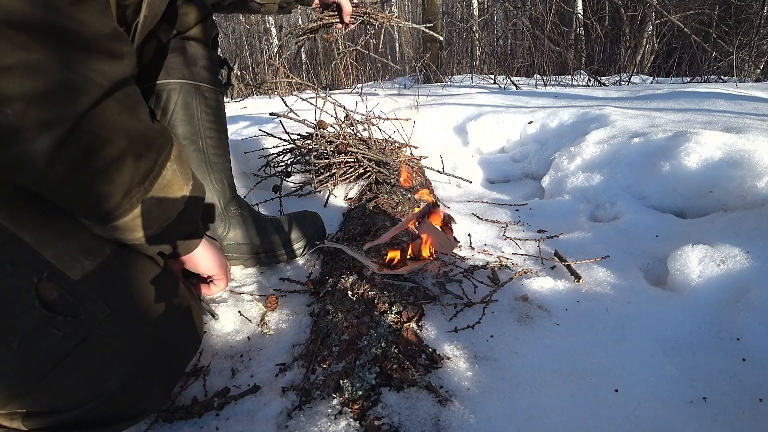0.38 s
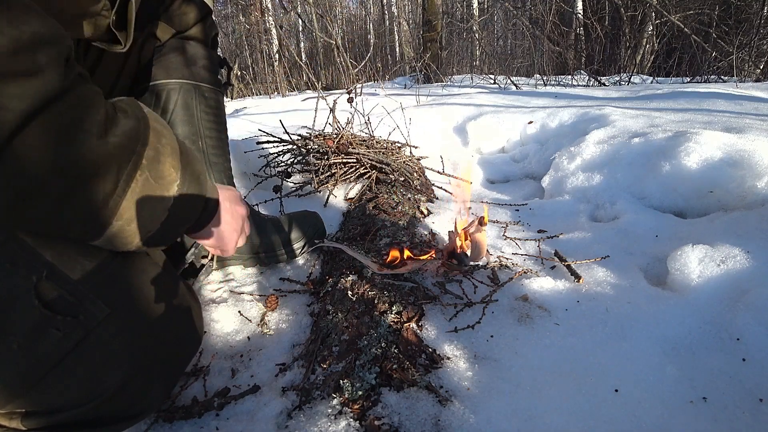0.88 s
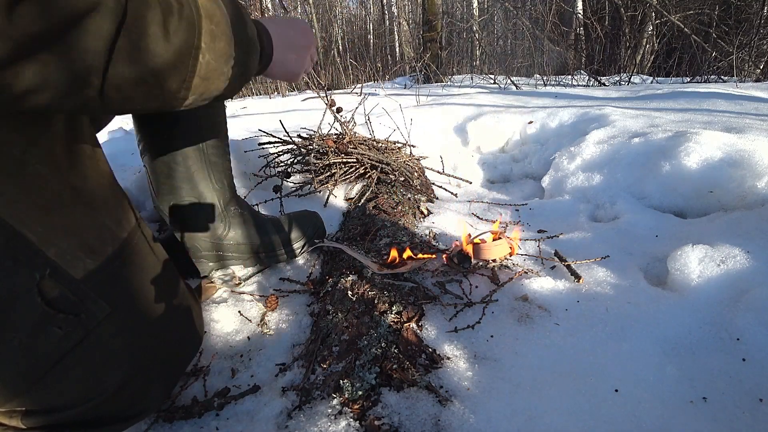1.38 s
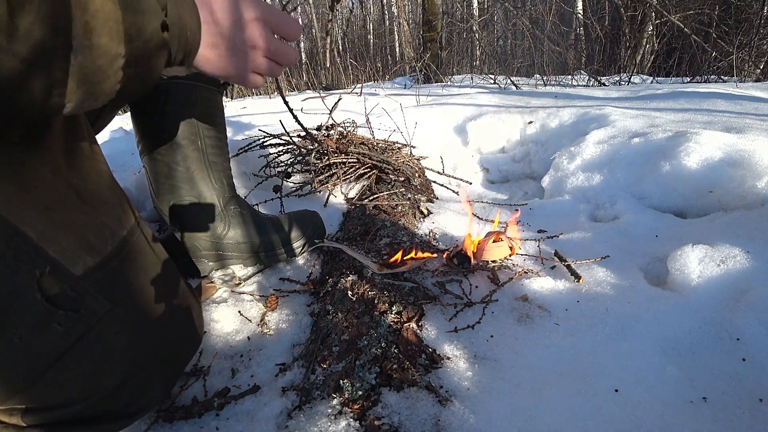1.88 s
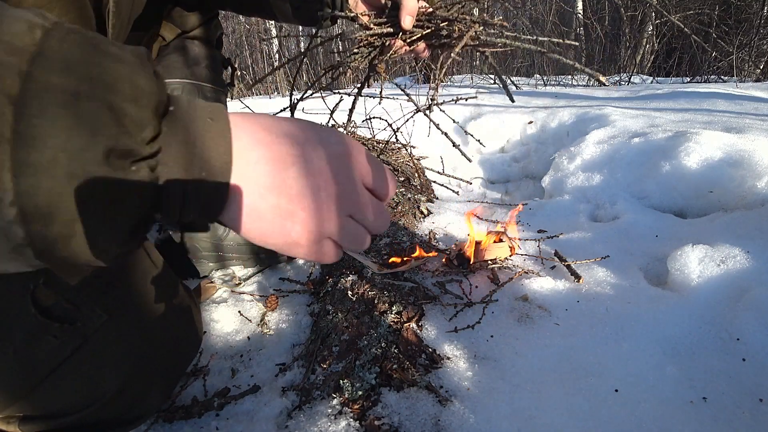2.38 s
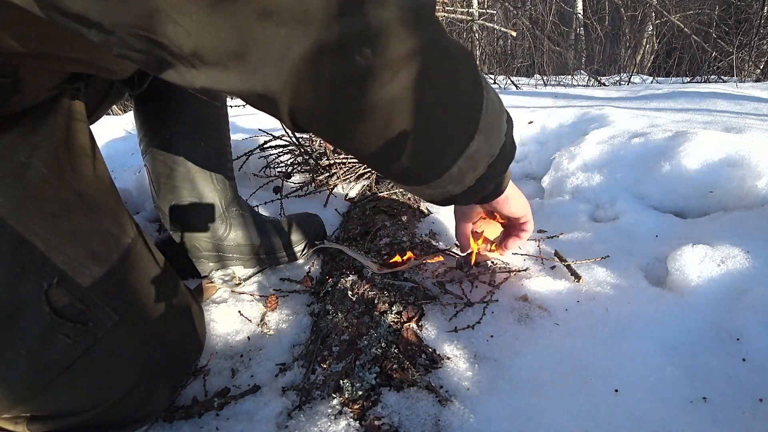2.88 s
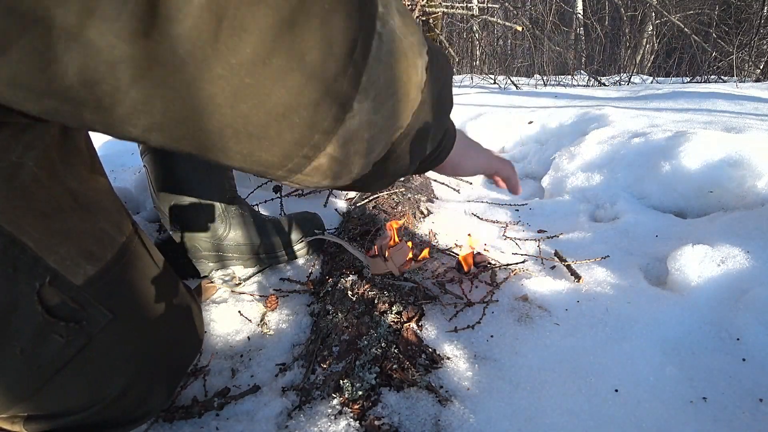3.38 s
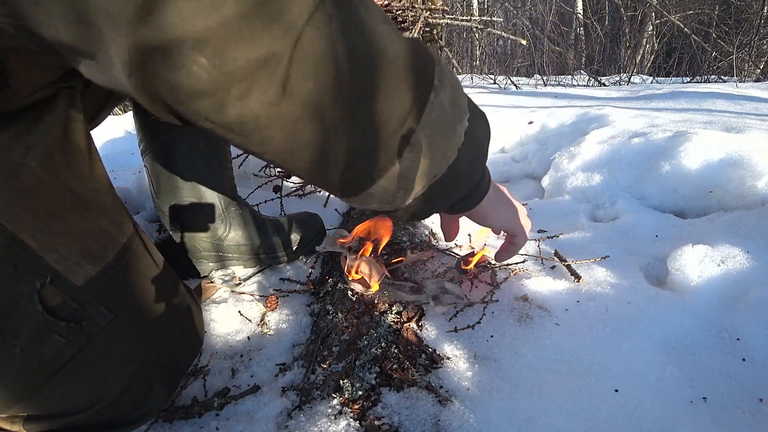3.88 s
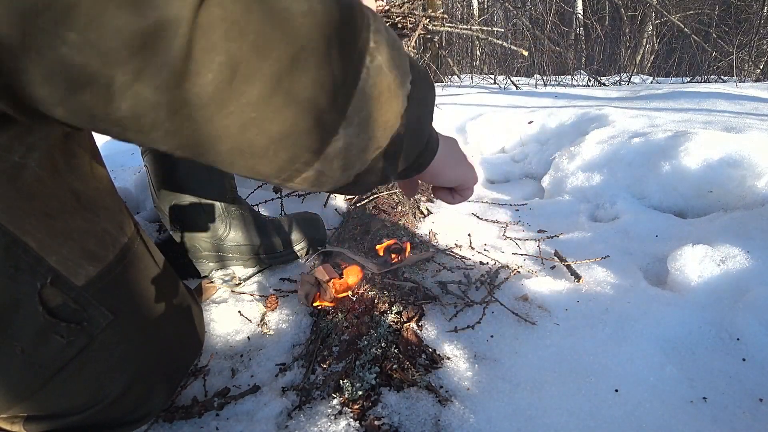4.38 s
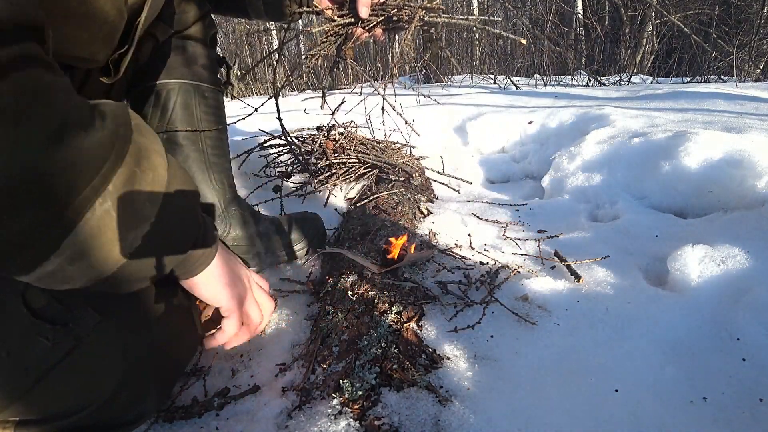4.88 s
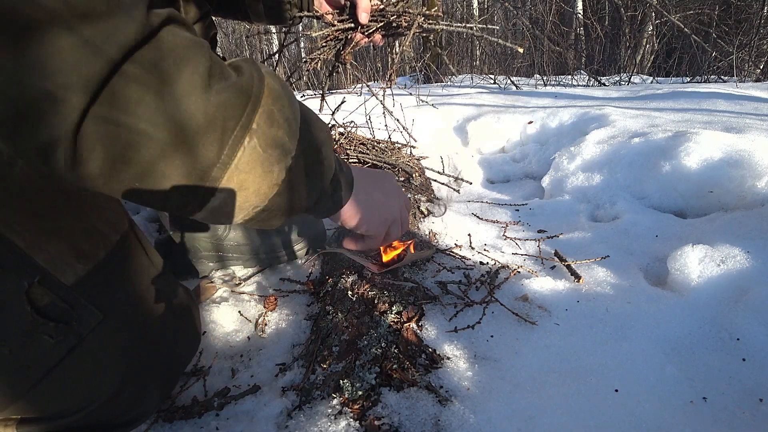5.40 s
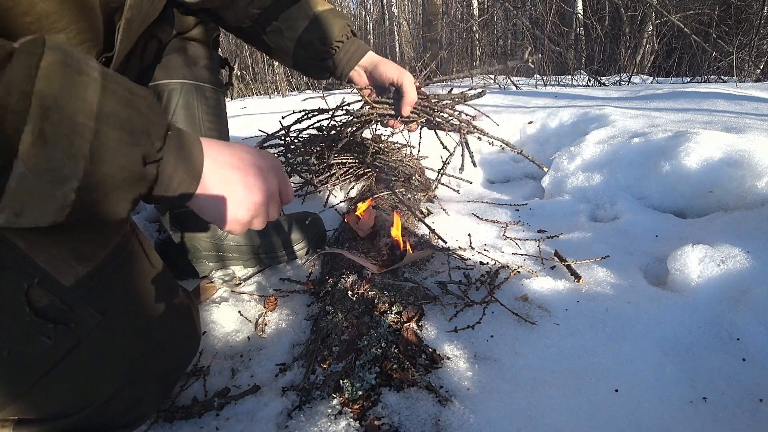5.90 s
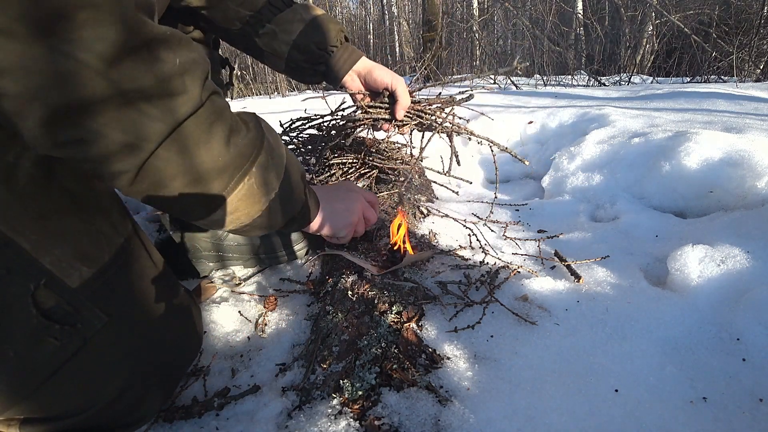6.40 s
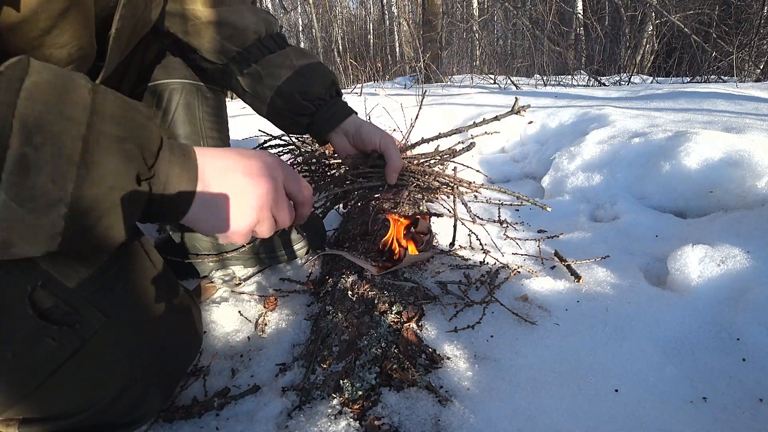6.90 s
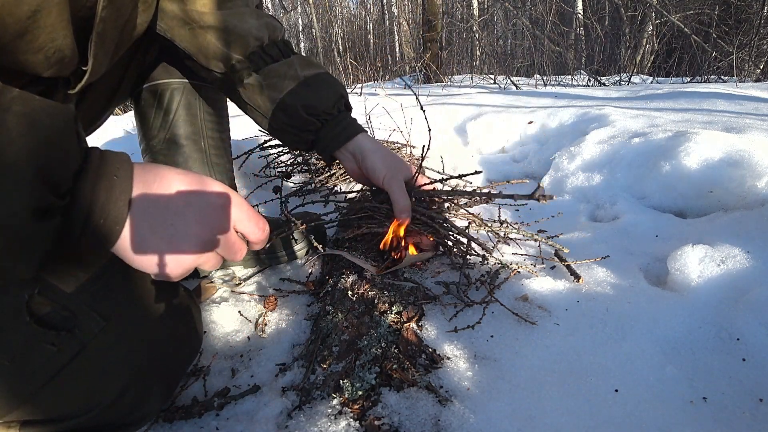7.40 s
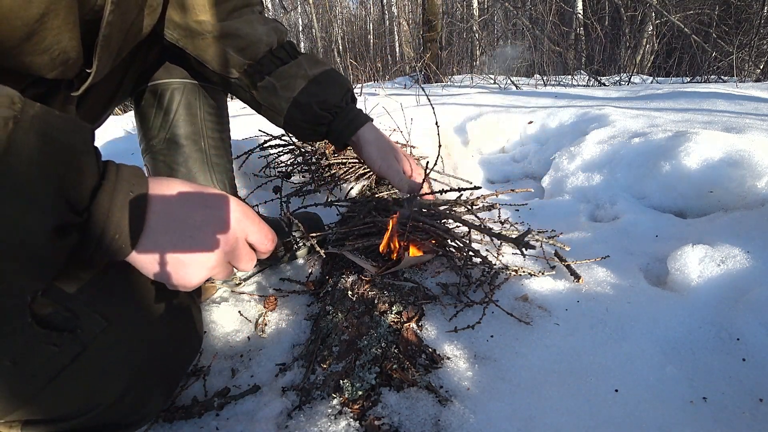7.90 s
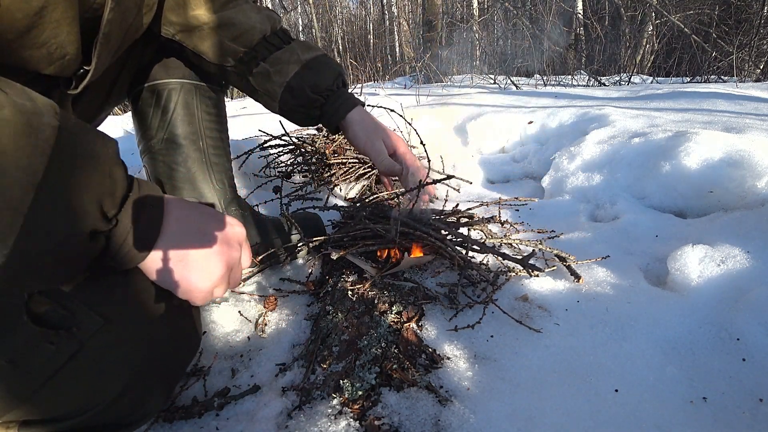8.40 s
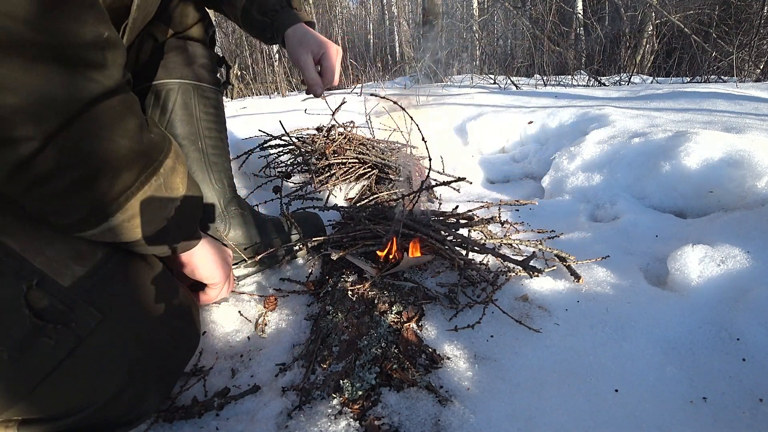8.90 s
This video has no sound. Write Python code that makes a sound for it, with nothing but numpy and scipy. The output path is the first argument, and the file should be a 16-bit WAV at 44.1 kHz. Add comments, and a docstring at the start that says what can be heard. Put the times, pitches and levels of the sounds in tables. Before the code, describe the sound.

Dry twigs are handled very close to a stereo microphone outdoors, beside a small fire in snow, with no echo. From 0 s a crisp, uneven rustle and scrape carries countless tiny ticks. A cluster of snaps with dull knocks and brief crunches comes at 0.4-0.6 s, then sparser snaps and a faint thin whistle around 1.1 s; a woody knock lands near 2 s. An arm swishes softly at 2.8 s. From 3 to 4.9 s brittle snaps crowd together, with strong ones at 3.2 and 4.6 s. The rustle eases around 5-5.8 s, then a knock and sleeve brush lead to fuller rustling near 6.1 s. The sharpest crack hits at 6.5 s, followed by another cloth swish. Snaps thicken from 7.3 to 8.5 s; a last swish, knock and bright rustle finish by 9 s. A faint low breeze stays underneath.

```python
"""By a small fire in the snow, a bundle of dry twigs is handled and laid down close to two microphone ports.
Twigs snap and tick: gritty bursts of noise excite resonances. Narrow-band noises crunch, chirp and whistle.
A thick stick knocks with decaying low modes. Scraping twigs, a brushing sleeve and a breeze at the ports
are coloured noises of uneven level, and four sweeps of the arm swish."""
import sys
import numpy as np
from scipy import signal
from scipy.fft import rfft, irfft, next_fast_len
from scipy.io import wavfile
from scipy.ndimage import uniform_filter1d, map_coordinates

SR = 44100
rng = np.random.default_rng(int(sys.argv[2]) if len(sys.argv) > 2 else 0)


def gain_from_decibels(decibels):
    """Convert decibel values to linear amplitude factors."""
    exponent = np.asarray(decibels, float) / 20
    return 10 ** exponent


def put_to_file(sound):
    """Save the sound as 16-bit audio at rate SR, in the file named by the first command-line argument."""
    columns = np.atleast_2d(sound).T  # one column per channel
    safe = np.clip(columns, -1, 1)
    whole_steps = np.round(safe * 32767)
    wavfile.write(sys.argv[1], SR, whole_steps.astype(np.int16))


N = 398223

# The snaps that stand out most from the rustle around them. Each row: time of the break in seconds,
# energy of the ring in dB over 1 ms, ring pitch in Hz, body against the ring in dB, spread of the burst in ms.
STANDOUT_SNAPS = [(0.1744, -29.0, 10300, -14, 0.29), (0.2472, -28.5, 7360, -2.5, 0.24),
                  (0.4088, -30.5, 3530, 0, 0.92), (0.4153, -28.0, 6160, -19, 0.57),
                  (0.4259, -27.0, 6220, -4, 1.4), (0.4378, -31.5, 3660, 0, 0.7),
                  (0.5305, -29.5, 10080, -1.5, 0.18), (0.5475, -29, 5770, -10, 0.77),
                  (0.5824, -39, 9730, -10, 0.12), (0.6662, -31, 7320, -18, 0.21),
                  (0.8789, -38, 10200, -12, 0.22), (0.9216, -37, 7640, -16, 0.12),
                  (1.022, -28.5, 6700, -16, 0.18), (1.4449, -33, 6420, -3.5, 0.22),
                  (1.469, -27.0, 9400, -21, 0.29), (1.8735, -29.5, 10000, -23, 0.14),
                  (1.9607, -43, 6200, 12, 0.63), (2.0, -24.5, 4020, -14, 0.56),
                  (2.2891, -26, 5230, -17, 0.53), (2.5761, -24, 5750, -21, 0.18),
                  (2.6641, -39, 7750, -15, 0.21), (2.8691, -28.5, 3920, -0.5, 0.85),
                  (2.9584, -21.5, 7600, -25, 0.28), (3.0884, -28, 5040, -22, 0.24),
                  (3.0944, -31, 4870, -17, 0.28), (3.1166, -28.0, 5700, -3.5, 0.17),
                  (3.1707, -16, 6900, -9, 0.12), (3.1845, -32.5, 10030, -4, 0.3),
                  (3.2473, -35.5, 4440, -3, 0.14), (3.3046, -32, 7620, -8, 0.16),
                  (3.318, -33, 6930, -21, 0.23), (3.33, -31.5, 6240, -15, 0.26),
                  (3.4261, -28.5, 10550, -11, 0.22), (3.4361, -32.0, 5990, -17, 0.21),
                  (3.4424, -28.5, 10290, -28, 0.24), (3.5716, -23, 10400, -15, 0.2),
                  (3.6025, -33.5, 6720, -5, 0.21), (3.6949, -33, 9990, -1, 0.26),
                  (3.7042, -30, 7320, -15, 0.35), (3.7404, -31, 9260, -10, 0.22),
                  (3.757, -30, 6680, -6, 0.17), (3.791, -24.5, 10100, -15, 0.18),
                  (3.8316, -26.5, 5680, -10, 0.39), (3.848, -27.5, 7550, -20, 0.16),
                  (3.8865, -36, 6680, -15, 0.25), (3.9343, -30, 5800, -12, 0.19),
                  (3.9516, -33, 5550, -4, 0.24), (4.0074, -32, 8790, -8, 0.14),
                  (4.041, -28.5, 5510, -7, 0.19), (4.0982, -25, 4740, -16, 0.87),
                  (4.114, -32, 5560, -12, 0.18), (4.1251, -23, 6300, -7, 0.32),
                  (4.1937, -23, 5300, -29, 0.18), (4.2012, -34, 4500, -21, 0.59),
                  (4.2274, -35.5, 6370, 2, 0.16), (4.353, -35, 7620, -3, 0.23),
                  (4.3768, -33.5, 8140, -10, 0.27), (4.4196, -25.5, 9950, -20, 0.13),
                  (4.4546, -32, 4520, -8, 0.28), (4.4775, -30, 4780, -8, 0.19),
                  (4.4909, -25.5, 10300, -25, 0.23), (4.5029, -28, 9780, -13, 0.15),
                  (4.5309, -29, 5940, -10, 0.19), (4.5594, -18.5, 9000, -18, 0.25),
                  (4.615, -29.5, 7800, -9, 0.18), (4.6238, -21.5, 9000, -13, 0.25),
                  (4.789, -33, 6930, -21, 0.17), (4.8146, -30.5, 6570, -11, 0.38),
                  (4.8454, -33.5, 6850, -5, 0.38), (4.8772, -35, 6870, -2, 0.29),
                  (5.062, -36, 8140, -0.5, 0.14), (5.0822, -32, 8230, -10, 0.19),
                  (5.198, -39, 3700, 3, 0.19), (5.294, -26, 8140, -34, 0.47), (5.4127, -33, 6030, -4, 0.19),
                  (5.4191, -29.0, 5700, -18, 0.35), (5.4539, -34, 5340, -5, 0.2),
                  (5.498, -35, 6630, -5, 0.2), (5.5951, -36, 8050, -4, 0.18),
                  (5.6214, -28, 9900, -16, 0.22), (5.712, -26, 8600, -32, 0.14),
                  (5.7206, -37, 6550, -15, 0.19), (5.7888, -33.5, 7900, -15, 0.24),
                  (5.9325, -27, 5850, -28, 0.37), (6.0255, -26.0, 4330, -3, 0.2),
                  (6.0953, -33, 7670, -6, 0.26), (6.1635, -28, 3620, -4, 0.16),
                  (6.221, -27, 6630, -8, 0.21), (6.2838, -34, 5740, -12.5, 0.21),
                  (6.3152, -37.5, 10250, 3, 0.53), (6.4809, -11.5, 6800, -5.5, 0.082),
                  (6.4965, -29.5, 5210, -8, 0.36), (6.5178, -42, 6850, 9, 0.26),
                  (6.5667, -33.5, 7060, -13, 0.13), (6.6167, -30.5, 5950, -7, 0.15),
                  (6.6343, -37.0, 6290, 3, 0.37), (6.667, -30.5, 8700, -18, 0.17),
                  (7.0965, -30.5, 4090, -2.5, 0.21), (7.2838, -24.0, 6900, -11, 0.28),
                  (7.3655, -32.0, 6850, -14, 0.28), (7.3742, -25.5, 7200, -15, 0.21),
                  (7.4303, -27.5, 10120, -22, 0.19), (7.4378, -30.5, 7450, 1.5, 0.53),
                  (7.5581, -26.5, 9350, -4.5, 0.4), (7.6171, -30, 7280, -5, 0.28),
                  (7.6279, -26.5, 7020, -5, 0.49), (7.7124, -40, 7000, -11, 0.29),
                  (7.7495, -29.5, 9470, 0.5, 0.51), (7.7667, -26.5, 4600, -5.5, 0.1),
                  (7.8113, -28.5, 7920, 0, 0.26), (7.8527, -35, 7490, -12, 0.24),
                  (7.8958, -37.5, 4180, 0, 0.2), (7.9107, -30.0, 10030, -4, 0.28),
                  (7.9568, -27.5, 3700, 4, 0.36), (7.9733, -30.5, 3600, -6, 0.26),
                  (8.0169, -36, 6850, 0, 0.34), (8.0485, -27.0, 9560, -6, 0.33),
                  (8.113, -31, 8500, -2, 0.084), (8.1838, -34, 4260, -6, 0.28),
                  (8.1938, -33, 5560, -2, 0.22), (8.2215, -31, 4980, -11, 0.44),
                  (8.286, -27.5, 8400, -14, 0.1), (8.3111, -26.0, 8180, -9.5, 0.13),
                  (8.3964, -32, 10550, -16, 0.18), (8.4605, -32.5, 7600, -3.5, 0.22)]
# Dull knocks. Each row: time of the blow in seconds, peak level in dB, pitch in Hz,
# time to decay by 60 dB in seconds.
DULL_KNOCKS = [(0.4182, -29, 122, 0.03), (0.45, -30.5, 150, 0.026), (0.467, -33.5, 378, 0.052),
               (0.485, -32, 241, 0.032), (0.547, -37, 183, 0.02), (1.4433, -35, 440, 0.04),
               (1.9605, -20.5, 412, 0.04), (2.0003, -39, 418, .03), (2.198, -34.5, 363, .04),
               (2.8686, -33, 163, 0.025), (3.3666, -34.5, 105, 0.038), (3.8305, -36, 331, .035),
               (3.9524, -31, 150, 0.02), (3.991, -36.5, 235, 0.031), (4.0439, -34, 129, 0.024),
               (4.6128, -39.5, 386, 0.037), (4.6442, -38.5, 167, 0.034), (5.0942, -40.5, 101, 0.032),
               (5.896, -27.5, 380, .06), (5.9311, -36, 394, 0.035), (6.0295, -36, 630, 0.034),
               (6.2494, -34, 586, .03), (6.767, -37.5, 158, 0.032), (7.2229, -38, 372, 0.034),
               (7.3678, -37.5, 190, 0.031), (7.6174, -38.5, 404, .04), (7.767, -39, 169, 0.03),
               (7.9537, -36.5, 178, 0.023), (8.7122, -39, 476, 0.036), (8.7544, -28.5, 390, 0.027)]
SAME_BLOW_S = 0.003  # a snap and a knock nearer than this belong to one blow


def unit(x):
    """Normalises the mean power: scaled to rms 1."""
    return x / np.sqrt(np.mean(x ** 2) + 1e-20)


def along(points, hz):
    """Interpolates (Hz, value) points linearly on a logarithmic frequency axis."""
    f, v = np.transpose(points)
    return np.interp(np.log(hz + 1), np.log(f + 1), v)


def curves(rows):
    """Interpolates in time: one value per sample for each column after the time."""
    s, *columns = np.transpose(rows)
    return [np.interp(np.arange(N) / SR, s, column) for column in columns]


def wobble(rate):
    """Slow random modulation: a smooth curve through random knots, rate of them a second."""
    knots = rng.standard_normal(int(N * rate / SR) + 4)
    return map_coordinates(knots, [np.arange(N) * rate / SR])


def filtered(x, response):
    """Linear filtering: the spectrum of x times a complex response of frequency."""
    size = next_fast_len(N + 8192)
    return irfft(rfft(x, size) * response(np.fft.rfftfreq(size, 1 / SR)), size)[..., :N]


def spread(pair, spectrum):
    """Partial coherence: two unrelated signals, coloured and mixed to a left and right of rms 1."""
    # Each row: frequency in Hz, likeness of left and right as a correlation.
    alike = [(60, 1), (140, 1), (350, 0.83), (840, 0.3), (2020, 0.36), (4880, 0.98), (11800, 0.86)]
    turn = lambda hz: np.arccos(np.clip(along(alike, hz), -1, 1)) / 2
    weights = lambda hz: gain_from_decibels(along(spectrum, hz)) * [np.cos(turn(hz)), np.sin(turn(hz))]
    mid, side = filtered(pair, weights)
    return unit(np.array([mid + side, mid - side]))


def placed(times, shapes, pan_db):
    """Superposition: one row of samples added at each start time, left and right apart by pan_db."""
    starts = np.round(times * SR).astype(int).clip(0)
    at = (starts[:, None] + np.arange(shapes.shape[1])).ravel()
    gains = [gain_from_decibels(sign * pan_db / 2)[:, None] for sign in (1, -1)]
    return np.array([np.bincount(at, (shapes * gain).ravel(), N + SR)[:N] for gain in gains])


def rubbing(level_db, spectrum, uneven, flutter_db, rate, grit_db):
    """Friction noise: its level flutters and is rough at a fine grain, as in a scrape."""
    grit = np.array([wobble(450), wobble(450)])  # separate for the two signals
    rough = gain_from_decibels(uneven * (flutter_db * wobble(rate) + grit_db * grit))
    return gain_from_decibels(level_db) * spread(rough * rng.standard_normal((2, N)), spectrum)


def breeze(level_db):
    """Turbulence at the microphone ports: noise that is strongest at low frequencies."""
    # Each row: frequency in Hz, relative level in dB per Hz.
    air_colour = [(12, 5), (20, -0.5), (135, 3), (269, -4), (387, -4), (500, -7.5), (650, -12.5),
                  (1100, -120)]
    return rubbing(level_db, air_colour, 1.0, flutter_db=0.5, rate=21, grit_db=4.5)


def sleeve(level_db):
    """Friction of cloth: a brushing noise richest in the middle frequencies."""
    # Each row: frequency in Hz, relative level in dB per Hz.
    sleeve_colour = [(88, -45), (150, -9.5), (428, -3), (851, -5), (915, -6), (1160, -5), (1960, -11),
                     (7460, -15), (11300, -47), (14700, -53), (22000, -120)]
    return rubbing(level_db, sleeve_colour, 0.84, flutter_db=0.53, rate=30, grit_db=4.5)


def scrape(level_db):
    """Friction of twig on twig: a bright noise with the roughest grain."""
    # Each row: frequency in Hz, relative level in dB per Hz.
    twig_colour = [(590, -9), (1000, -4.5), (1630, -8), (2450, -4.5), (3290, -0.5), (5260, -4.5),
                   (7210, 1.5), (8750, -4), (10500, 2), (11400, -11), (14800, -44), (22000, -120)]
    return rubbing(level_db, twig_colour, 0.89, flutter_db=1.5, rate=25, grit_db=6.5)


def cracks(s, db, ring_hz, body_hz, body_db, ms, pan_db, size, rise, tail_db, width, broad_db, grit_db):
    """Brittle fracture: fibres part in a gritty burst that swells fast and dies, through ring and body."""
    t, f = (np.arange(size) - size // 3) / SR, np.fft.rfftfreq(size, 1 / SR)
    mode = lambda hz, w: 1j * f * w / (hz ** 2 - f ** 2 + 1j * f * w + 1e-9)  # resonance of width w Hz
    life = ms[:, None] / 1000 + 1e-5
    burst = np.exp(np.where(t < 0, t / rise, -t) / life / 1.84)  # rise: swell time over decay time
    splinters = gain_from_decibels(tail_db) * np.exp(np.where(t < 0, t / 0.0012, -t / 0.003))
    noise, grit = rng.standard_normal((2, len(s), size))
    gritty = noise * gain_from_decibels(grit_db * uniform_filter1d(grit, size=4))
    force = rfft(gritty * (burst + splinters))

    ring = mode(ring_hz[:, None], width * ring_hz[:, None]) + gain_from_decibels(broad_db) * mode(9200, 15200)
    bright = irfft(force * ring * mode(5230, 13200) ** 2, size)
    low = mode(body_hz[:, None], 1.43 * body_hz[:, None]) ** 2 + gain_from_decibels(-11.5) * mode(1450, 2000)
    body = irfft(force * low, size)
    per_ms = lambda x: x / np.sqrt((x ** 2).sum(1, keepdims=True) * 1000 / SR)  # energy of rms 1 for 1 ms
    shapes = gain_from_decibels(db)[:, None] * (per_ms(bright) + gain_from_decibels(body_db)[:, None] * per_ms(body))
    return placed(s + t[0], shapes, pan_db)


def crackle(rustle_db, pan_db, count, clump_db, size_db, level_db):
    """A clustered random process: small ticks in clumps, thickest around the snaps, a few much larger."""
    breaks = np.bincount([int(row[0] * SR) for row in STANDOUT_SNAPS], minlength=N)
    near = uniform_filter1d(breaks * SR / 40, size=SR // 40)  # snaps within 12 ms
    odds = np.cumsum((1 + 0.6 * near) * gain_from_decibels(clump_db * wobble(35)))
    draw = rng.random((count, 6))
    at = np.searchsorted(odds / odds[-1], draw[:, 0]).clip(0, N - 1)

    excess_db = np.minimum(-size_db * np.log(draw[:, 1]), 14)
    db = rustle_db[at] + level_db + excess_db
    hz = 3800 * 2.8 ** draw[:, 2]
    body_db = -16 + 12 * draw[:, 3]
    ms = 0.032 * 6 ** draw[:, 4] ** 2
    side_db = pan_db[at] + 4 * (draw[:, 5] - 0.5)
    return cracks(at / SR, db, hz, 0.37 * hz, body_db, ms, side_db, size=300, rise=0.4, tail_db=-18,
                  width=0.22, broad_db=-17.5, grit_db=7)


def middle_snaps(rustle_db, pan_db, count, top_db, range_db, busier):
    """A random process of middle-size snaps, more often while the bundle rustles harder."""
    odds = np.cumsum(gain_from_decibels(busier * rustle_db))
    draw = rng.random((count, 7))
    even = (np.arange(count) + draw[:, 0]) / count  # one draw in each equal share of the odds
    at = np.searchsorted(odds / odds[-1], even).clip(0, N - 1)

    db = top_db - range_db * draw[:, 6]
    hz = 4200 * 3.06 ** draw[:, 1]
    body_hz = 3700 / 4.7 ** draw[:, 2] ** 2
    body_db = -17 + 13 * draw[:, 3]
    ms = 0.15 * 5 ** draw[:, 4] ** 2
    side_db = pan_db[at] + 1.5 * (draw[:, 5] - 0.5)
    return cracks(at / SR, db, hz, body_hz, body_db, ms, side_db, size=900, rise=0.69, tail_db=-27,
                  width=0.72, broad_db=-16.5, grit_db=5.5)


def narrow_noises(pan_db, size):
    """Resonant filtering: noise through one narrow resonance, under a bell-shaped swell."""
    # Short narrow-band noises: crunches near 3 kHz, chirps near 4 kHz, a faint whistle at 7.7 kHz.
    # Each row: middle in seconds, length in seconds, level in dB, pitch in Hz, resonance width in Hz.
    bands = [(0.065, 0.051, -45, 3180, 1000), (0.41, 0.038, -37.5, 3120, 906),
             (0.424, .014, -36.5, 3000, 900), (0.596, 0.014, -43, 4230, 404),
             (.655, 0.011, -48.5, 3300, 400), (0.757, 0.018, -47, 4000, 300),
             (1.126, 0.062, -44, 7670, 120), (4.082, 0.0068, -36, 4120, 800),
             (7.44, 0.0053, -34, 1940, 590)]
    s, length, db, hz, width = np.transpose(bands)[:, :, None]
    t, f = (np.arange(size) - size // 2) / SR, np.fft.rfftfreq(size, 1 / SR)
    resonance = f * width / (hz ** 2 - f ** 2 + 1j * f * width)
    noise = irfft(rfft(rng.standard_normal((len(s), size))) * resonance ** 2, size)
    swell = np.exp(-(2 * t / length) ** 2)
    shapes = gain_from_decibels(db) * noise / noise.std(1, keepdims=True) * swell
    return placed(s[:, 0] + t[0], shapes, pan_db[(s[:, 0] * SR).astype(int)])


def snaps(pan_db):
    """Fracture of single twigs; a snap that falls on a knock has the low body of a thick stick."""
    s, db, hz, body_db, ms = np.transpose(STANDOUT_SNAPS)
    thick = np.abs(s[:, None] - np.transpose(DULL_KNOCKS)[0]).min(1) < SAME_BLOW_S
    body_hz = np.where(thick, 1200, 2940)
    side_db = pan_db[(s * SR).astype(int)] + 1.3 * (rng.random(len(s)) - 0.5)
    return cracks(s, db, hz, body_hz, body_db, ms, side_db, size=900, rise=0.43, tail_db=-14,
                  width=0.17, broad_db=-8.0, grit_db=6)


def knocks():
    """Modal decay: a thick stick or a boot thuds in a few low modes, blurred by the scuff of the contact."""
    # Each row: multiple of the pitch, level in dB before any softening, share of the decay time.
    stick_modes = [(1, 2, 1), (1.6, 1.5, 0.52), (2.2, -1.5, .35), (3.5, -4, 0.37)]
    s, db, hz, t60 = np.transpose(DULL_KNOCKS)[:, :, None]
    t = np.arange(SR // 8) / SR
    rise = 0.6 / hz  # 0.6 of a cycle
    # a blow away from those snaps is softer: each mode loses 4 dB times its multiple of the pitch
    soft = np.abs(s - np.transpose(STANDOUT_SNAPS)[0]).min(1, keepdims=True) > SAME_BLOW_S
    ring = 0
    for multiple, level, share in stick_modes:
        decay = gain_from_decibels(level - 4 * soft * multiple - 60 * t / (share * t60))
        ring = ring + decay * np.sin(2 * np.pi * multiple * hz * t)
    noise = rng.standard_normal((len(s), len(t)))
    band = uniform_filter1d(noise, size=24) - uniform_filter1d(noise, size=70)
    scuff = band * gain_from_decibels(2 - 60 * t / t60)
    shapes = (ring + scuff) * (1 - np.exp(-t / rise))
    peak = np.abs(shapes).max(1, keepdims=True)
    return placed((s - 0.6 * rise)[:, 0], gain_from_decibels(db) * shapes / peak, 0 * s[:, 0])


def sweeps():
    """Friction noise of cloth as the arm sweeps, and how far (0-1) each moment lies inside a sweep."""
    # Each row: start in seconds, length in seconds, level of the dull part in dB, of the bright part in dB.
    arm_moves = [(2.74, .24, -53.5, -44), (5.859, .44, -52, -47.5), (6.631, .48, -51, -50),
                 (8.598, .34, -49, -41)]
    # Each row of both: frequency in Hz, relative level in dB per Hz.
    dull_colour = [(80, -26), (150, -7.5), (420, -1.5), (850, -5.5), (1500, -12), (3000, -42),
                   (22000, -120)]
    bright_colour = [(400, -26), (1000, -4), (2000, 1), (7700, 0), (10900, -6.5), (14700, -50),
                     (22000, -120)]
    swell_s, fade_s = 0.09, 0.05
    s, length, dull_db, bright_db = np.transpose(arm_moves)[:, :, None]
    t = np.arange(N) / SR
    shape = np.clip((t - s) / swell_s, 0, 1) * np.clip((s + length - t) / fade_s, 0, 1)
    dull_noise = rubbing(0, dull_colour, 1, flutter_db=3, rate=30, grit_db=2.5)
    bright_noise = rubbing(0, bright_colour, 1, flutter_db=1.5, rate=55, grit_db=2.0)
    dull = (gain_from_decibels(dull_db) * shape).sum(0) * dull_noise
    bright = (gain_from_decibels(bright_db) * shape).sum(0) * bright_noise
    return dull + bright, shape.max(0)


def scene():
    """Superposition of all sources; scrape, ticks and sleeve fall quieter while the arm sweeps."""
    # Each row: time in seconds, then base levels in dB of twig rustle, sleeve and air at the ports,
    # left over right in dB.
    handling = [(0.0, -46, -50.5, -59, 1), (0.33, -47, -50, -57.5, 1.5), (0.53, -43, -51.5, -55.5, 0.5),
                (1.46, -48, -55, -56, 0.0), (1.99, -48, -49.5, -59, 2), (2.51, -44.5, -52.5, -57.5, 0),
                (2.84, -45, -49, -52.5, 0.0), (3.19, -46.5, -59, -58.5, -0.5), (3.59, -50.5, -55, -56, 1.0),
                (3.97, -43, -51.5, -52.5, 0), (4.42, -45.5, -54.5, -53, 0.5), (4.73, -50, -55, -57, 3.0),
                (5.61, -52, -56.5, -57, 0.5), (5.83, -50.5, -54.5, -57, 2.5), (6.09, -43, -43, -55.5, 1),
                (6.41, -48.5, -59, -59, 1.0), (6.61, -50, -59.5, -57, 0), (6.89, -48, -50, -55, 2.5),
                (7.97, -45, -54.5, -57, -0.5), (8.42, -47.5, -53.5, -59, 0.0), (8.78, -41.5, -48.5, -59, 4),
                (9.03, -43, -51.5, -57.5, -0.5)]
    rustle_db, sleeve_db, air_db, pan_db = curves(handling)
    swish, sweeping = sweeps()
    lull_db = -2.2 * np.abs(wobble(15)) * (1 - sweeping)  # the bundle and the sleeve rest for moments
    twigs_db = rustle_db - 5 * sweeping

    air = breeze(air_db)
    cloth = sleeve(sleeve_db - 4 * sweeping + 0.87 * lull_db + 2.0)
    scraping = scrape(twigs_db - 3.0 + lull_db)
    ticks = crackle(twigs_db, pan_db, count=4000, clump_db=4.5, size_db=5.0, level_db=-7.0)
    middle = middle_snaps(twigs_db, pan_db, count=200, top_db=-33.5, range_db=10.5, busier=1.1)
    breaks = middle + snaps(pan_db)
    panned = (cloth + scraping + swish) * gain_from_decibels([pan_db / 2, -pan_db / 2])
    return breaks + knocks() + narrow_noises(pan_db, size=6000) + ticks + air + panned


def roll_off(x):
    """The treble ends steeply here."""
    return signal.sosfilt(signal.butter(12, 12360, fs=SR, output="sos"), x)


def record(dry):
    """Phase difference and band limit: a small phase lead between the ports, a steep treble cut near 11.3 kHz."""
    # Band limit of the whole sound. Each row: frequency in Hz, gain in dB.
    edge = [(20, 5.5), (11100, 1), (11450, -20), (13000, -38), (16000, -36), (17000, -90)]
    # Each row: frequency in Hz, phase in radians by which the left port leads.
    lead = [(0, 0.077), (690, 0.39), (3360, 0.67), (10600, 0.57), (11200, 0.82), (12000, 0.2)]
    phase = lambda hz: along(lead, hz) * [[0.5], [-0.5]]
    ports = filtered(dry, lambda hz: gain_from_decibels(along(edge, hz)) * np.exp(1j * phase(hz)))
    return roll_off(ports)


dry = scene()
out = record(dry)
put_to_file(out)
```